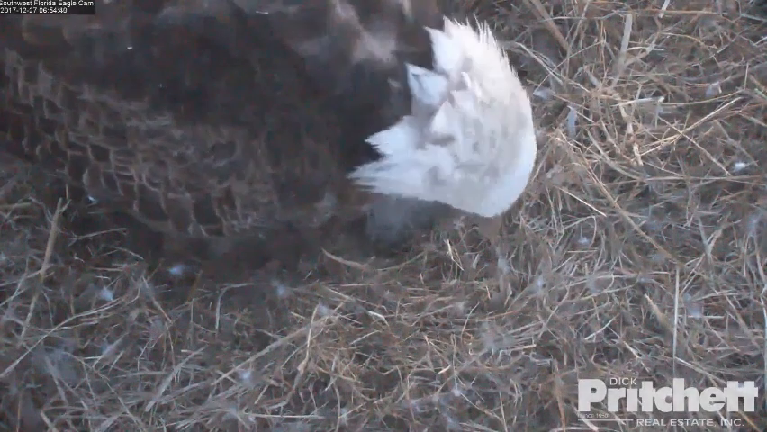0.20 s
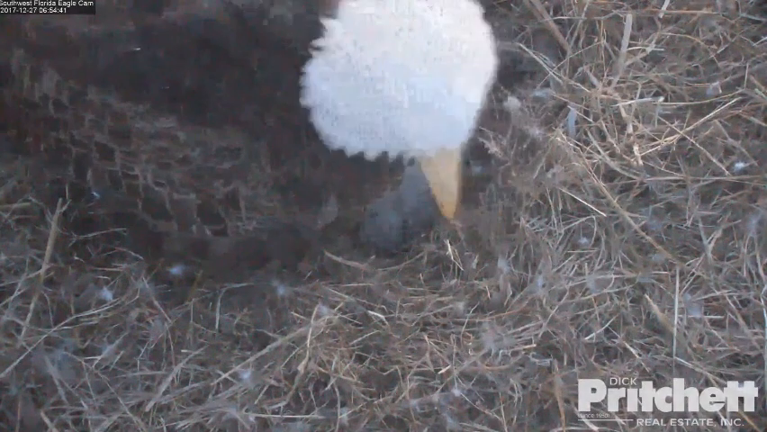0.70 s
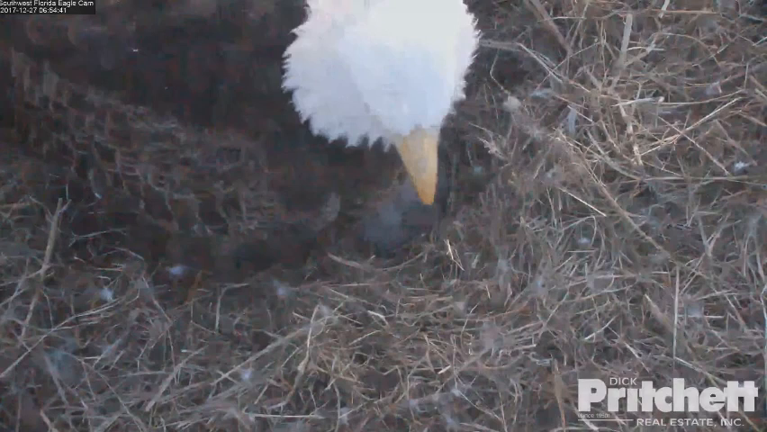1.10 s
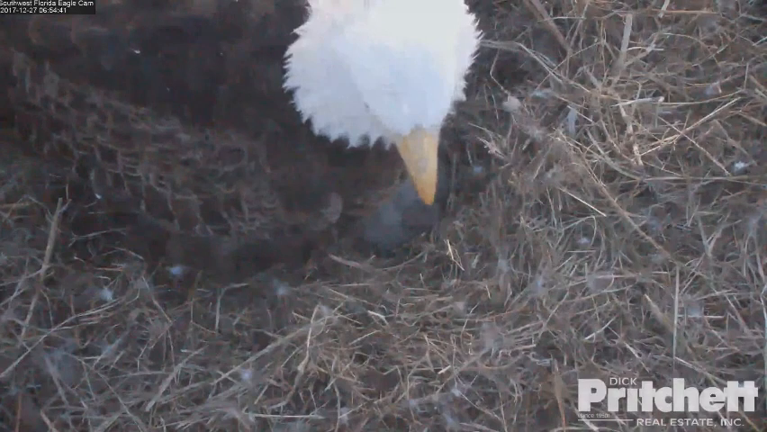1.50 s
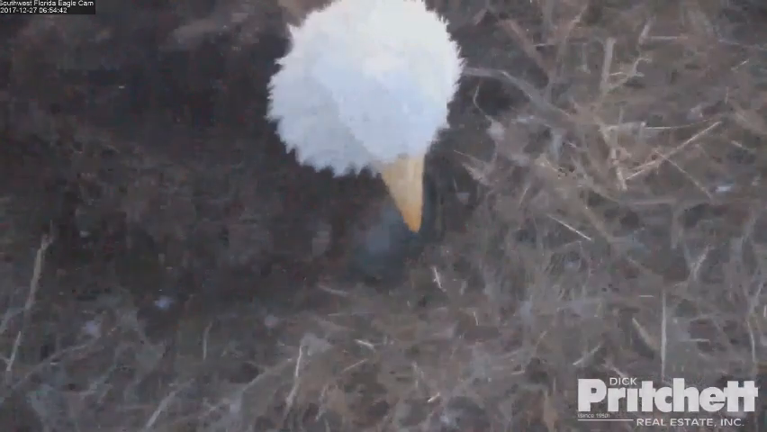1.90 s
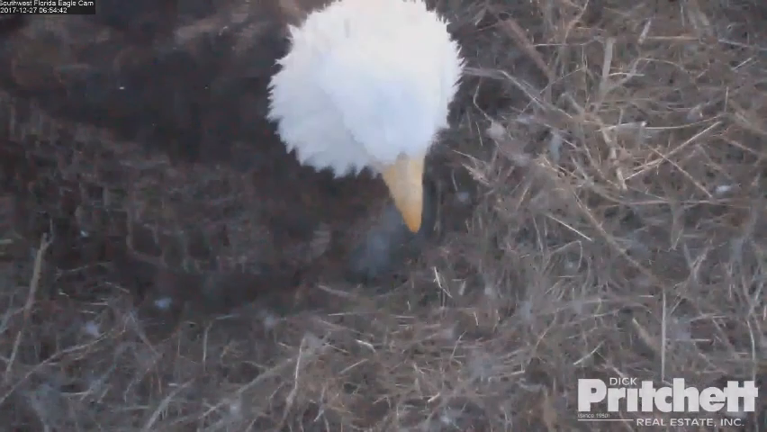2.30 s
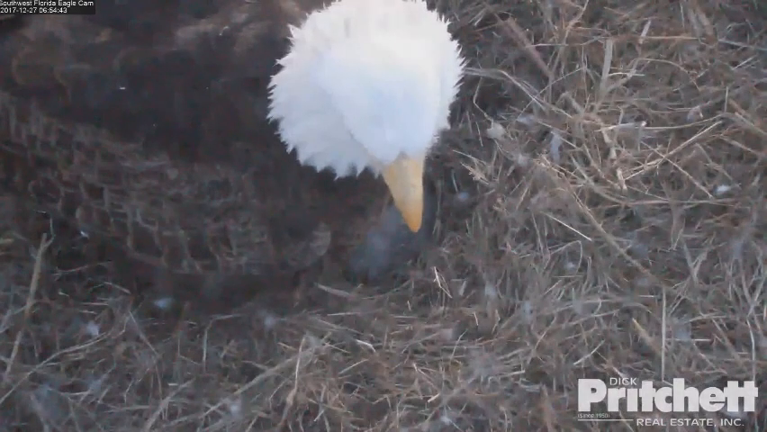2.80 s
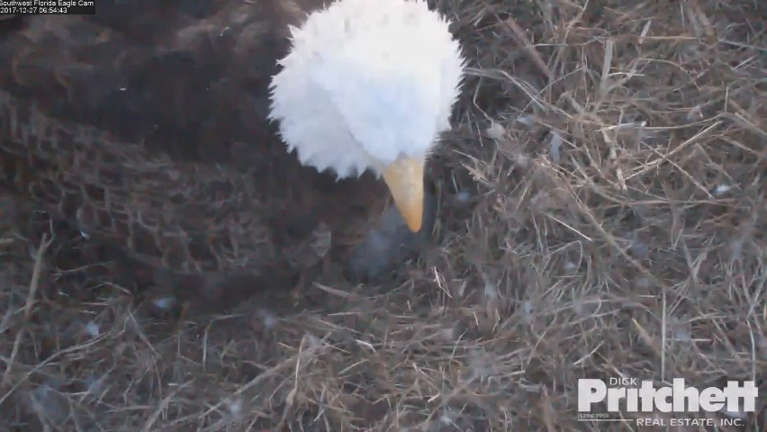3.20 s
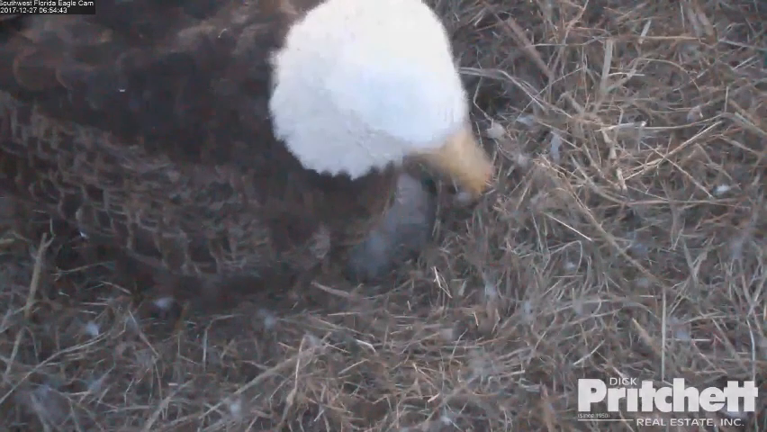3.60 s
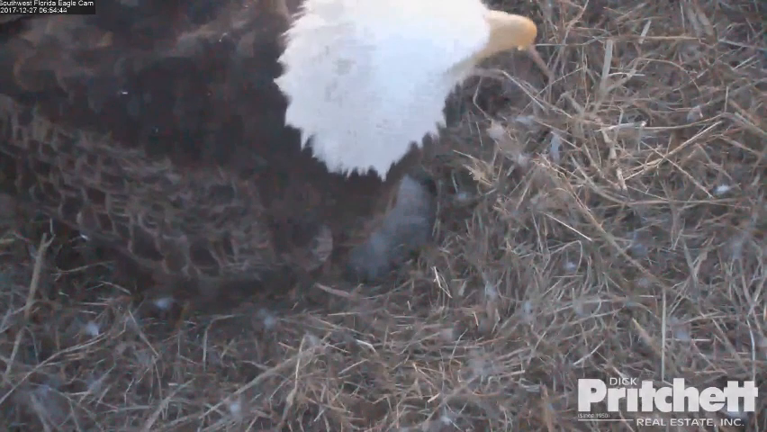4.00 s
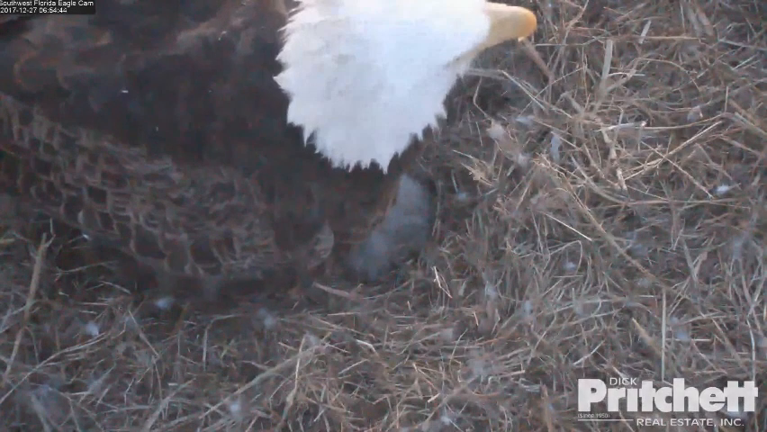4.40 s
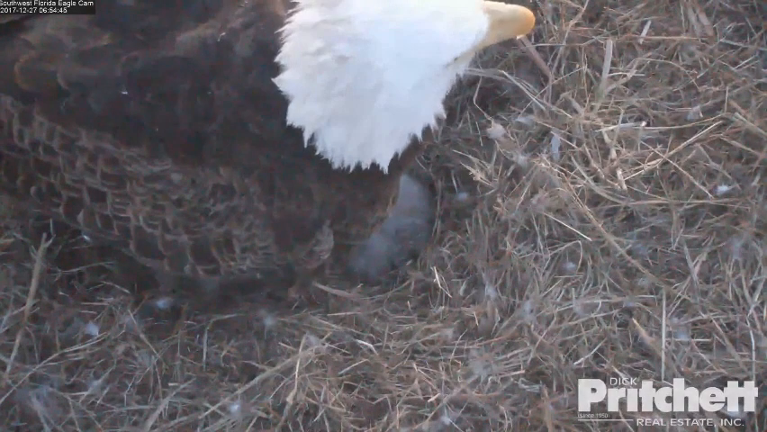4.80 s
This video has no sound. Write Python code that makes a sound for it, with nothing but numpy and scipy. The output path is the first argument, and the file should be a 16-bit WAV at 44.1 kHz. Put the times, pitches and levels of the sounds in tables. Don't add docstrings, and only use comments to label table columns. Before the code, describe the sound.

Dense, harsh straw rustling and sharp snaps close up, thinning to small crackles and single ticks, with soft far-off traffic behind.

```python
import sys
import numpy as np
from scipy import signal
from scipy.fft import rfft, irfft
from scipy.io import wavfile
from scipy.ndimage import uniform_filter1d

SR = 44100
rng = np.random.default_rng(int(sys.argv[2]) if len(sys.argv) > 2 else 0)


def voltage_ratio(level):
    return 10 ** (np.asarray(level, float) / 20)


def log_audio(samples):
    frames = np.atleast_2d(samples).T
    limited = np.clip(frames, -1, 1)
    pcm = np.round(limited * 32767).astype(np.int16)
    wavfile.write(sys.argv[1], SR, pcm)


N = 220884

# t/s, hiss level/dB, rumble level/dB
ROAD_FADES = [(0.0, -49.5, -64.5), (0.3, -47.5, -61.5), (0.45, -51, -65.5), (1.32, -54, -66.5),
              (1.8, -51, -66.5), (2.05, -49.5, -68.5), (2.35, -49.5, -68.5), (2.97, -52, -66),
              (3.46, -49.5, -67), (4.5, -51.5, -64.5), (5.01, -51, -67.5)]
# f/Hz, density level/dB
HISS_TONE = [(240, -49.5), (400, -22.5), (651, -7.5), (995, -12.5), (1410, 3), (1810, 1), (2130, -6.5),
             (2630, 1.5), (2980, -1.5), (3180, -11), (4030, -26), (4560, -29.5), (7900, -62.5),
             (10300, -82), (17400, -120)]
# f/Hz, density level/dB
RUMBLE_TONE = [(12, -48.5), (20, -21), (87, -9.5), (289, -6.5), (342, -4), (406, -7.5), (645, -4.5),
               (800, -3.5), (1040, -27.5), (1760, -120)]
# peak t/s, half length/s, level/dB, f/Hz, glide/(Hz/s)
DRONES = [
    (0.43, .13, -76, 104.5, -.5),
    (1.1, 0.56, -77, 99.5, -8),
    (2.3, 0.53, -78.5, 93, -12),
    (3.85, 0.32, -77.5, 90, 0.5),
    (5.0, .4, -83, 92, -5),
    (1.52, 0.82, -74.5, 343, -.5),
    (2.95, .7, -73.5, 341, -1.5),
    (3.95, .45, -70.5, 337, -3.5),
    (4.85, 0.33, -76, 360, -.5),
    (4.6, 0.99, -78, 166.3, 3),
]
# t/s, level/dB, length/s, top f/Hz
PUFFS = [
    (0.178, -46, 0.0072, 1200),
    (0.32, -54.5, 0.011, 900),
    (0.173, -80, .02, 140),
    (.31, -76, 0.028, 140),
    (1.62, -75.5, 0.069, 140),
    (2.674, -73, 0.051, 140),
    (3.202, -77, .05, 102.7),
    (3.48, -80, .05, 49.7),
    (4.6, -70.5, 0.087, 140),
]
# f/Hz, density level/dB
GRASS_TONE = [(88, -63), (150, -27), (320, -24), (355, -31), (477, -18.5), (1050, -12.5), (1370, -11.5),
              (1810, -13.5), (2830, 0), (3590, -10.5), (4040, -15.5), (4550, -26.5), (5200, -36),
              (6760, -56.5), (11400, -120)]
# f/Hz, density level/dB
STRAW_TONE = [(2000, -27), (3400, -4), (4030, -5.5), (4370, -16.5), (4580, -14.5), (4700, -18.5),
              (6070, -27.5), (7800, -50.5), (10100, -81), (17200, -120)]
# peak t/s, rub level/dB, rise/(s per 10 dB), fall/(s per 10 dB), chaff over rub/dB
STIRS = [(.04, -42, .015, .04, -34), (.198, -33.5, .08, .035, -39), (.345, -34, .045, .14, -38),
         (.51, -37, .08, .07, -35), (.64, -46, .03, .15, -39), (.92, -46, .2, .2, -38),
         (1.15, -50, .2, .18, -42), (1.55, -51, .25, .3, -36), (1.81, -46, .2, .04, -26),
         (2.1, -54, .2, .2, -33), (2.42, -51, .25, .3, -42), (2.63, -55, .15, .08, -46),
         (2.92, -51, .2, .1, -33), (3.05, -46, .15, .1, -39), (3.26, -46, .2, .13, -42),
         (3.39, -56, .1, .07, -25), (3.74, -49, .35, .4, -41), (4.02, -54, .15, .3, -31),
         (4.48, -50, .3, .4, -42), (4.95, -50, .4, .4, -39)]
# t/s, peak level/dB, ring f/Hz, settling t60/s,
# papery brightness/dB
STEM_CRACKLES = [(0.0315, -28.5, 2930, 0.18, -4), (0.084, -31.5, 2960, 0.21, -9),
                 (0.1096, -31, 2780, 0.2, -2), (0.147, -31, 2850, 0.27, -4),
                 (0.172, -29.5, 2900, 0.21, -8), (0.2653, -31, 2550, 0.089, -6.5),
                 (0.3023, -30, 2720, 0.11, 0), (0.3137, -22, 2526, 0.43, 4), (0.3874, -37, 3030, 0.14, 1),
                 (.412, -39, 2850, 0.11, -2), (.43, -42, 2740, 0.1, -1), (.453, -39, 2850, .1, -2),
                 (0.483, -32, 2840, 0.25, 2), (.518, -37.5, 2810, 0.16, 1.5),
                 (.546, -35.5, 2660, 0.091, -1), (0.624, -37, 2920, 0.11, 7),
                 (0.6406, -38.5, 2720, 0.22, 14),
                 (0.848, -39, 2775, 0.13, 7), (0.879, -43.5, 2640, 0.36, -12),
                     (1.056, -37.5, 2950, 0.21, -2), (1.0805, -37, 2710, 0.23, 3),
                     (1.199, -41.5, 2610, 0.18, 3), (1.443, -38, 2650, 0.17, -8.5),
                     (1.5961, -33.5, 2580, 0.34, 2), (1.6721, -41, 2700, 0.29, 3),
                     (1.7594, -25, 2757, 0.15, -14), (1.803, -41, 2940, 0.063, 2.5),
                     (2.1146, -41, 3000, 0.12, -3), (2.141, -35.5, 3020, 0.3, -10),
                     (2.244, -37.5, 3020, 0.15, -7), (2.3717, -37.5, 3010, 0.15, -5),
                     (2.4937, -36, 2890, 0.24, -2), (2.5392, -37, 2770, 0.026, 1),
                     (2.607, -39, 2870, 0.18, -19),
                 (2.7419, -36, 2840, 0.23, 2), (2.889, -34.5, 2780, 0.15, -2),
                    (3.003, -34.5, 2905, 0.26, -3), (3.1368, -35, 2570, 0.13, -3),
                    (3.1636, -39, 3330, 0.13, 3), (3.286, -40, 3030, 0.11, -10),
                    (3.3689, -31.5, 3060, 0.12, -10), (3.4152, -38, 2720, 0.15, -3),
                    (3.497, -33, 2676, 0.22, -3), (3.6494, -34.5, 2584, 0.35, -1),
                    (3.82, -38.5, 2680, 0.13, -9), (3.9876, -33, 2550, 0.093, -5),
                    (4.0134, -37.5, 2960, 0.071, -6), (4.146, -41, 2700, 0.23, 5),
                    (4.362, -42, 2850, 0.13, -3.5), (4.5131, -36.5, 2710, 0.14, 0),
                    (4.9223, -39.5, 2650, 0.099, -6)]
# t/s, peak level/dB
FAINT_CRACKLES = [(0.5835, -44), (0.7482, -41.5), (0.832, -38.5), (1.2252, -50), (1.8819, -39.5),
                  (1.947, -39), (2.018, -51), (2.4355, -41), (2.808, -45.5), (2.9744, -55), (3.1894, -40.5),
                  (3.2237, -39), (3.7968, -48), (3.8482, -41), (4.199, -48), (4.5585, -43), (4.811, -48),
                  (4.8857, -43)]
# t/s, tick level/dB, ring level/dB
SNAPS = [(0.036, -50, -43), (0.085, -50, -47), (0.1101, -50, -36), (0.1495, -50, -33.5), (0.172, -50, -48),
         (0.2668, -62, -41), (0.279, -50, -42), (0.3013, -54, -30), (0.316, -50, -45), (0.352, -50, -31),
         (0.388, -63, -42), (0.4174, -52, -35), (0.4539, -54, -21), (0.481, -51, -30), (0.5184, -50, -38),
         (0.53, -50, -30), (0.6416, -60, -33), (1.085, -62, -35), (1.7614, -50, -38.5), (1.785, -50, -27.5),
         (1.8016, -60, -29), (1.825, -59, -41.5), (2.1505, -52.5, -37.5), (2.153, -55.5, -32),
         (3.0061, -54, -34), (3.367, -58, -38), (3.4986, -63, -39), (3.666, -62, -41), (3.507, -59, -34),
         (3.987, -68, -41)]

REST_RUB_DB, REST_CHAFF_DB = -66, -100
RUB_BRIGHT_DB = 1
TICK_DB = -44.5
FAINT_HZ, FAINT_SPREAD_HZ, FAINT_T60_S, FAINT_BRIGHT_DB = 2780, 170, 0.11, 1
CEILING = 0.017
NOISE_FLOOR_DB, DUCK_DB = -94, 7.5


def unit_rms(x):
    return x / np.sqrt(np.mean(x ** 2) + 1e-20)


def in_time(rows):
    s, *columns = np.transpose(rows)
    return [np.interp(np.arange(N) / SR, s, c) for c in columns]


def filtered(x, order, hz, kind):
    return signal.sosfilt(signal.butter(order, hz, kind, fs=SR, output="sos"), x)


def colour(x, spectrum):
    hz, db = np.transpose(spectrum)
    grid = np.maximum(np.arange(4097) * SR / 8192, 1)
    cepstrum = irfft(np.log(voltage_ratio(np.interp(np.log(grid), np.log(hz), db))))
    cepstrum[1:4096] *= 2
    cepstrum[4097:] = 0
    impulse = irfft(np.exp(rfft(cepstrum)))
    return signal.fftconvolve(x, impulse)[:len(x)]


def drift(rate):
    r = np.exp(-2 * np.pi * rate / SR)
    wander = signal.lfilter([1], [1, -2 * r, r * r], rng.standard_normal(N + SR))
    return unit_rms(wander[SR:])


def road():
    hiss_db, rumble_db = in_time(ROAD_FADES)
    hiss = unit_rms(colour(rng.standard_normal(N), HISS_TONE))
    rumble = unit_rms(colour(rng.standard_normal(N), RUMBLE_TONE))
    return hiss * voltage_ratio(hiss_db + 1.5 + 0.58 * drift(5.3)) + rumble * voltage_ratio(rumble_db - 0.5)


def drones():
    t, out = np.arange(N) / SR, np.zeros(N)
    waver_db, waver_hz = 0.86 * drift(4.1), 0.99 * drift(3.7)
    for s, length, level_db, hz, glide in DRONES:
        swell = voltage_ratio(level_db + waver_db) * np.exp(-((t - s) / length) ** 4)
        phase = 2 * np.pi * np.cumsum(hz + glide * (t - s) + waver_hz) / SR
        out += np.sqrt(2) * swell * np.sin(phase)
    return out


def puffs():
    t, air, out = np.arange(N) / SR, rng.standard_normal(N), np.zeros(N)
    for s, level_db, length, top_hz in PUFFS:
        low = unit_rms(filtered(air, 2, [36, top_hz], "band"))
        out += voltage_ratio(level_db) * np.exp(-((t - s) / length) ** 2) * low
    return out


def stirring():
    t = np.arange(N) / SR
    rub, sift = voltage_ratio(REST_RUB_DB), voltage_ratio(REST_CHAFF_DB)
    for s, rub_db, rise, fall, chaff_db in STIRS:
        tens_of_db = np.where(t < s, (s - t) / max(rise, 0.005), (t - s) / max(fall, 0.005))
        swell = voltage_ratio(rub_db - 10 * tens_of_db)
        rub = rub + swell
        sift = sift + swell * voltage_ratio(chaff_db)
    return rub, sift


def chaff(sift):
    high = filtered(rng.standard_normal(N), 2, [4800, 7600], "band")
    return sift * voltage_ratio(-9 + 1.0 * drift(60)) * unit_rms(high)


def grains(per_s, spread_db):
    sizes = voltage_ratio(spread_db * np.minimum(rng.exponential(1, N), 3.5)) * rng.choice([-1, 1], N)
    slips = sizes * (rng.random(N) < per_s / SR)
    body = unit_rms(colour(slips, GRASS_TONE))
    top = voltage_ratio(-17.5) * unit_rms(colour(slips, STRAW_TONE))
    return body, top


def rubbing(rub):
    body, top = grains(9000, spread_db=1.0)
    clumps = voltage_ratio(-6.5 + 2.2 * drift(65))
    return rub * clumps * (filtered(body, 1, 900, "high") + voltage_ratio(RUB_BRIGHT_DB - 5.5) * top)


def ring(hz, rise, t60, length):
    t = np.arange(length) / SR
    return np.sin(2 * np.pi * hz * t) * (1 - np.exp(-t / rise)) * voltage_ratio(-60 * t / t60)


def add(track, s, piece):
    i = round(s * SR)
    track[i:i + len(piece)] += piece[:N - i]


def all_crackles():
    faint = []
    for s, peak_db in FAINT_CRACKLES:
        hz = FAINT_HZ + FAINT_SPREAD_HZ * rng.standard_normal()
        faint.append((s, peak_db, hz, FAINT_T60_S, FAINT_BRIGHT_DB))
    return STEM_CRACKLES + faint


def crackles(breaks):
    notes, spray, edge = np.zeros((3, N))
    t = np.arange(SR // 3) / SR
    for s, peak_db, hz, t60, bright_db in breaks:
        decay = voltage_ratio(peak_db - 7.5 - 60 * t / np.clip(t60, 0.02, 1))
        dying = decay * (1 - np.exp(-t / 0.0009))
        add(spray, s, dying)
        add(edge, s, dying * voltage_ratio(bright_db))
        note = ring(hz, rise=0.00036, t60=0.069, length=3000)
        overtone = ring(1.25 * hz, rise=0.00044, t60=0.02, length=3000)
        add(notes, s, voltage_ratio(peak_db - 5.5) * note)
        add(notes, s, voltage_ratio(peak_db + bright_db - 18.5) * overtone)
    body, top = grains(5000, spread_db=3.0)
    thin = filtered(body, 2, 2350, "high")
    return notes + spray * (thin + 0.23 * body) + edge * top


def snaps(breaks):
    rings, gate = np.zeros((2, N))
    t = np.arange(600) / SR
    crackle_ticks = [(s + 0.0017, db + TICK_DB, db) for s, db, *_ in breaks]
    for s, tick_db, ring_db in SNAPS + crackle_ticks:
        faintness_db = min(tick_db + 69, 0)
        housing = ring(2800, rise=0.00036, t60=0.015, length=2000)
        add(rings, s - 0.0012, voltage_ratio(ring_db - 3 + faintness_db) * housing)
        decay = voltage_ratio(min(tick_db, -50) - 4 - 60 * t / 0.009)
        add(gate, s, decay * (1 - np.exp(-t / 0.0005)))
    sizzle = filtered(rng.standard_normal(N), 2, [5900, 7700], "band")
    return rings + gate * unit_rms(sizzle)


def scene():
    rub, sift = stirring()
    breaks = all_crackles()
    behind = road() + drones() + puffs()
    nest = chaff(sift) + rubbing(rub) + crackles(breaks) + snaps(breaks)
    return (behind + nest)[None]


def limit(x):
    steep = signal.cheby2(12, 50, 8000, fs=SR, output="sos")
    return signal.sosfilt(steep, np.clip(x, -CEILING, CEILING))


def roll_off(x):
    return signal.sosfilt(signal.butter(12, 15700, fs=SR, output="sos"), x)


def record(dry):
    clipped = 1.0 * (np.abs(dry) > CEILING)
    overload = uniform_filter1d(clipped, size=2048, axis=1)
    noise_db = NOISE_FLOOR_DB - DUCK_DB * np.clip(overload / 0.03, 0, 1)
    mix = limit(dry) + voltage_ratio(noise_db) * rng.standard_normal(dry.shape)
    return roll_off(mix)


dry = scene()
out = record(dry)
log_audio(out)
```